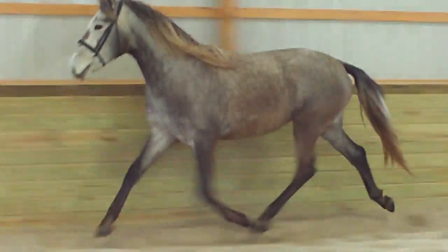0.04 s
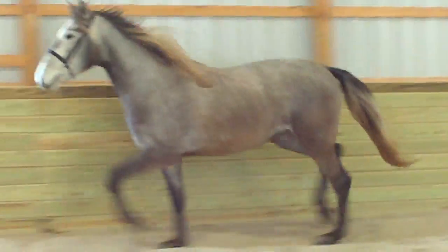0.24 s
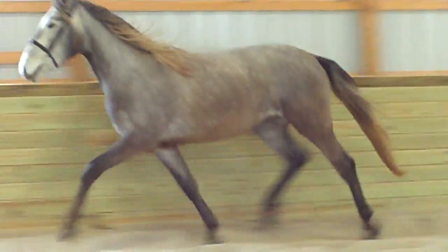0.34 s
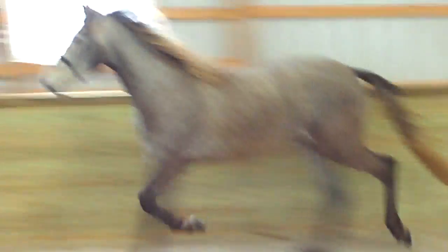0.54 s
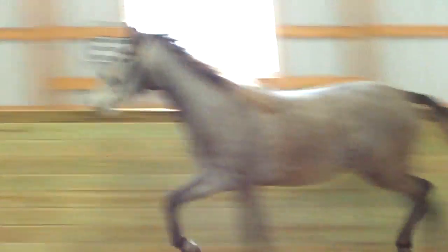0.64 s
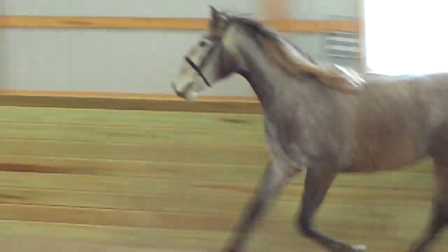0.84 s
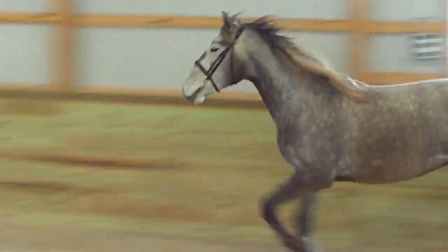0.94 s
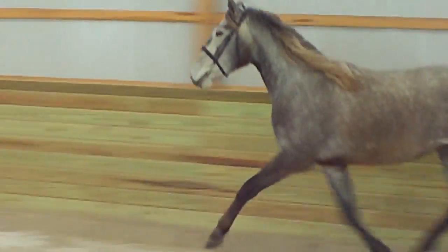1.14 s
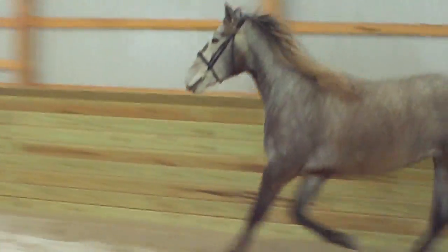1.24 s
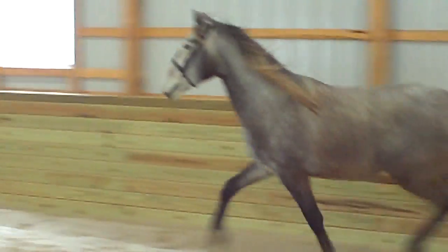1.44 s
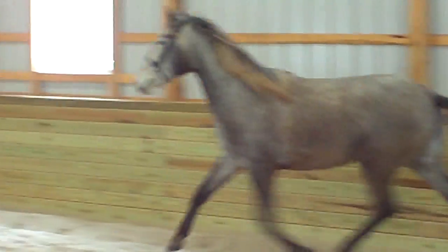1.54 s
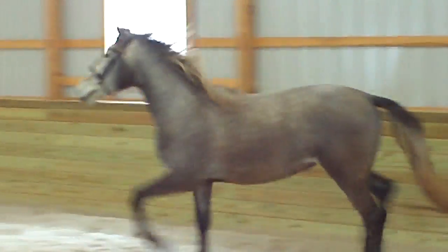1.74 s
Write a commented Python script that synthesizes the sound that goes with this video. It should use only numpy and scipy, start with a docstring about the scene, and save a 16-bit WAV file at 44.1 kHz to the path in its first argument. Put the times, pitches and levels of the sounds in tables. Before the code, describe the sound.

A horse trots on sand with dull, low hoof thuds in an indoor arena.

```python
"""An indoor riding arena, where a horse trots on deep sand. Each hoof pushes on the soft ground and makes
a short dull thud over a deep thump; one step also knocks on firmer ground. Sand grains crunch as the
hooves scuff them. The wooden side boards throw the sound back at once, the far walls later, and it dies
away in the hall. A low boom swells after each step; a steady hiss and rumble fill the building."""
import sys
import numpy as np
from scipy import signal
from scipy.fft import rfft, irfft
from scipy.io import wavfile

SR = 44100
rng = np.random.default_rng(int(sys.argv[2]) if len(sys.argv) > 2 else 0)


def dump(signal):
    """Clip the signal to [-1, 1] and save it as 16-bit WAV at the path in sys.argv[1]."""
    limited = np.clip(np.atleast_2d(signal).T, -1, 1)
    pcm = np.round(limited * 32767).astype(np.int16)
    wavfile.write(sys.argv[1], SR, pcm)


N = 79380
T = np.arange(N) / SR

# Hooves landing on the sand: start_s, level_db, pitch_hz, width_ratio, thump_level_db
FOOTFALLS = [(0.001, -34.5, 191.2, 1.12, -35), (0.2427, -23, 198, 1.45, -27.5),
             (0.2626, -12, 187.4, 1.392, -32.5), (0.6213, -7.5, 198, 1.473, -29),
             (1.0108, -23.5, 186, 1.28, -26), (1.3767, -17.5, 176, 1.35, -25),
             (1.762, -30.5, 246, 1.29, -52), (1.7820, -44, 200, 0.96, -47)]


def from_db(db):
    """Turn decibels into a number to multiply by."""
    return 10 ** (np.asarray(db) / 20)


def rms_one(x):
    """Scale a sound so that its average level (rms) is 1."""
    return x / np.sqrt(np.mean(x ** 2) + 1e-20)


def band(x, low_hz, high_hz, order=2):
    """Keep the part of a sound between two frequencies."""
    return signal.sosfilt(signal.butter(order, [low_hz, high_hz], "band", fs=SR, output="sos"), x + 1e-18)


def around(x, pitch_hz, width_ratio):
    """Keep a band around one pitch; a bigger ratio makes it wider."""
    width_ratio = max(width_ratio, 1.1)
    return band(x, pitch_hz / width_ratio, pitch_hz * width_ratio, order=3)


def hoof_push(start_s, pitch_hz, width_ratio):
    """One soft push makes the ground swing briefly and settle. The peak is 1."""
    push_cycles = 0.42   # the push lasts this share of one swing
    push = np.sin(np.pi * np.clip((T - start_s) * pitch_hz / push_cycles, 0, 1)) ** 2
    swing = around(-push, pitch_hz, width_ratio)
    return swing / np.abs(swing).max()


def thuds():
    """Each hoof lands with a dull thud, and the horse's weight sinks in with a deeper thump."""
    out = np.zeros(N)
    for start_s, level_db, pitch_hz, width_ratio, thump_level_db in FOOTFALLS:
        out += from_db(level_db) * hoof_push(start_s, pitch_hz, width_ratio)
        out += from_db(thump_level_db) * hoof_push(start_s, pitch_hz=50.6, width_ratio=2.04)
    return out


def knocks():
    """A hoof meets firmer ground with short, hollow knocks just before a thud."""
    # Touches of the hoof: start_s, level_db, pitch_hz
    touches = [(0.2425, -31.5, 790), (0.2468, -24.5, 738), (0.2590, -31.5, 806)]
    return sum(from_db(level_db) * hoof_push(start_s, pitch_hz, width_ratio=1.284)
               for start_s, level_db, pitch_hz in touches)


def scuffs():
    """Many sand grains crunch under a hoof: a hollow scrape with a faint, wide rustle."""
    # Sand pushed by a hoof: start_s, level_db, length_s, pitch_hz
    sand_pushes = [(0.129, -49.5, 0.11, 720), (0.2354, -35.5, 0.013, 759), (0.265, -40, 0.03, 758),
                   (0.297, -39.5, 0.04, 424), (0.355, -43.5, .04, 514), (0.48, -46.5, 0.044, 871),
                   (0.626, -37, .022, 590), (0.858, -43.5, 0.049, 830), (1.296, -44, 0.071, 794),
                   (1.381, -38, 0.024, 536), (1.436, -38, 0.011, 782), (1.755, -45, 0.031, 868)]
    grains_per_s, rise_s = 4300, 0.0062
    grains = rng.standard_normal(N) * (rng.random(N) < grains_per_s / SR)
    rustle = from_db(-14.5) * rms_one(band(grains, low_hz=300, high_hz=2700))
    out = np.zeros(N)
    for start_s, level_db, length_s, pitch_hz in sand_pushes:
        age_s = T - start_s
        pressure = np.clip(age_s / rise_s, 0, 1) * np.exp(-(age_s / length_s) ** 2)
        scrape = rms_one(around(grains, pitch_hz, width_ratio=1.235))
        out += from_db(level_db) * pressure * (scrape + rustle)
    return out


def wall_echoes(x):
    """Walls send back weaker copies of a sound; the farther the wall, the later the copy."""
    # Echoes from the wooden side boards: delay_s, level_db
    side_boards = [(0.018, -6), (.0234, -5)]
    # Echoes from the far walls: delay_s, level_db
    far_walls = [(0.096, -17), (0.12, -12.5), (0.139, -14), (0.177, -20)]
    return sum(from_db(level_db) * np.interp(T - delay_s, T, x, left=0)
               for delay_s, level_db in [*side_boards, *far_walls])


def hall_reverb(x):
    """Countless echoes blur into a tail that builds up and dies away."""
    build_s, fade_s = 0.059, 1.6   # the tail falls 60 dB in fade_s
    build_up = 1 - np.exp(-(T / build_s) ** 2)
    tail = rng.standard_normal(N) * build_up * from_db(-60 * T / fade_s)
    tail /= np.sqrt(np.sum(tail ** 2))
    return from_db(-6.5) * signal.fftconvolve(x, tail)[:N]


def hall_boom():
    """The hall's low notes swell and sink after every footfall, a little more after a loud one."""
    rise_s = 0.064
    power = np.zeros(N)
    for start_s, level_db, *_ in FOOTFALLS:
        age = np.maximum(T - start_s, 0) / rise_s   # 1 at the top of the swell
        swell = from_db(-31 + 0.2 * level_db) * age * np.exp(1 - age)
        power += swell ** 2
    rumble = rms_one(band(rng.standard_normal(N), low_hz=23.7, high_hz=137))
    return np.sqrt(power) * rumble


def building_air():
    """The air of the building carries a steady low rumble and a hiss."""
    # How strong the noise is from low to high: frequency_hz, relative_level_db
    noise_shape = [(20, 9.5), (40, -5), (80, -4.5), (170, -4), (250, -19), (350, -9.5), (480, -16.5),
                   (760, -17.5), (1100, -21), (2000, -23), (3200, -26), (5000, -31), (6000, -39.5),
                   (7000, -52)]
    frequency_hz, relative_level_db = np.transpose(noise_shape)
    all_hz = np.fft.rfftfreq(N, 1 / SR)
    gain = from_db(np.interp(np.log(all_hz + 1), np.log(frequency_hz), relative_level_db))
    gain *= np.minimum(all_hz / frequency_hz[0], 1) ** 2   # fade out what is too low to hear
    noise = irfft(rfft(rng.standard_normal(N)) * gain, N)
    return from_db(-37.5) * rms_one(noise)


def scene():
    """The hooves and their echoes over the background of the building, in one channel."""
    hooves = thuds() + knocks() + scuffs()
    reflected = wall_echoes(hooves) + hall_reverb(hooves)
    return (hooves + reflected + hall_boom() + building_air())[None]


def record(dry):
    """Cut away the highest treble steeply."""
    cutoff_hz = 7100
    return signal.sosfilt(signal.ellip(10, .1, 70, cutoff_hz, fs=SR, output="sos"), dry)


dry = scene()
out = record(dry)
dump(out)
```